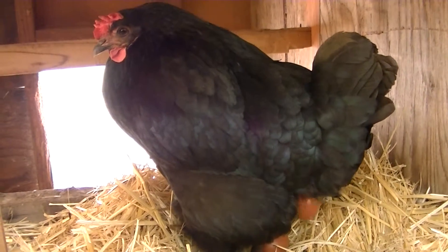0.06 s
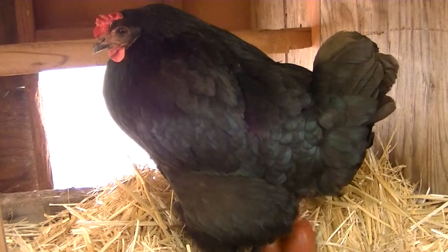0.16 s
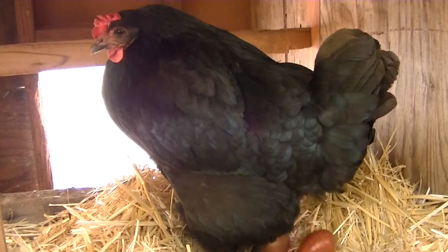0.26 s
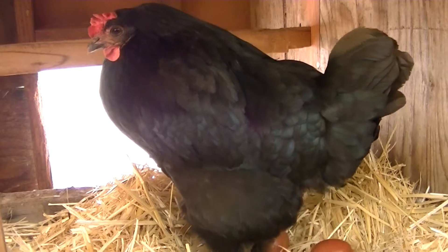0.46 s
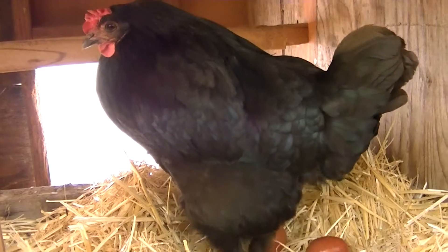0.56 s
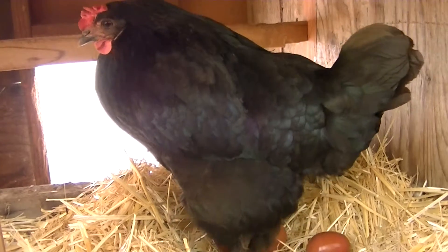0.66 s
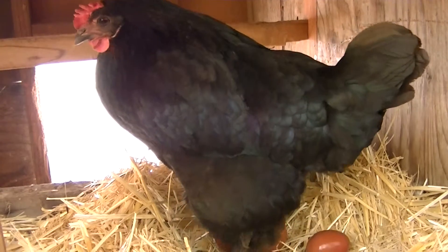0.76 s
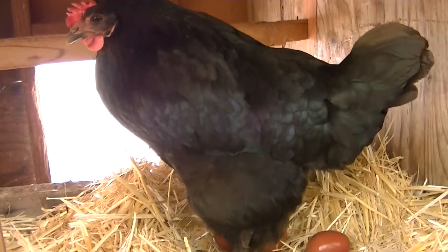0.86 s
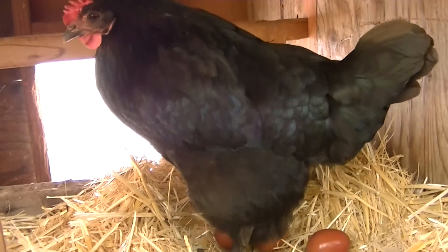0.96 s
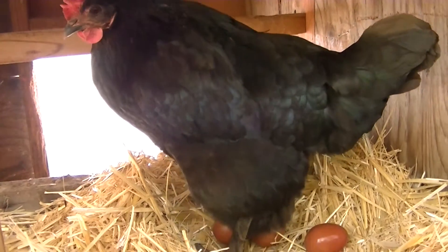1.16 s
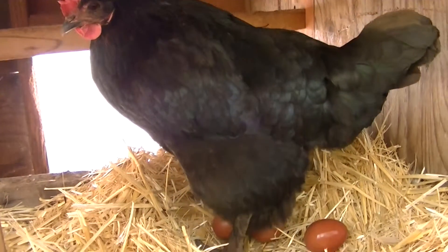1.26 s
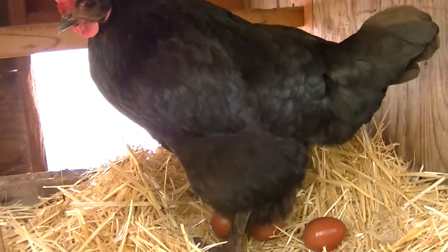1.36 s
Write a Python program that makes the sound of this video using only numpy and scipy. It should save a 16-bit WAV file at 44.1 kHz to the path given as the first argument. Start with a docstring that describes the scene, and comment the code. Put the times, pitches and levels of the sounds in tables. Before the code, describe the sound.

An egg drops with a sharp thud in a wooden nest box, then straw rustles faintly.

```python
"""A hen lays an egg

The egg drops through straw onto the wooden floor of a nest box. Impact excites the modes of shell
and boards, a click and a thud; the egg bounces and rolls away through crackling straw. The standing
hen shifts her feet, over a low outdoor rumble that comes into the small wooden coop."""
import sys
import numpy as np
from scipy import signal
from scipy.fft import rfft, irfft
from scipy.io import wavfile

SR = 44100
rng = np.random.default_rng(int(sys.argv[2]) if len(sys.argv) > 2 else 0)


def unload_audio(sound):
    """Save the sound as a 16-bit wav file, at the path given as the first command line argument."""
    columns = np.transpose(np.atleast_2d(sound))
    # keep every value between -1 and 1, then stretch to whole-number steps
    steps = np.round(np.clip(columns, -1, 1) * 32767)
    wavfile.write(sys.argv[1], SR, steps.astype(np.int16))


N = 61739
TIME = np.arange(N) / SR
FREQ_HZ = np.fft.rfftfreq(N, 1 / SR)

# The egg landing, bouncing and rocking on the floor: start_s, strength_db, contact_ms
KNOCKS = [(0.2066, -2, 0.15), (0.2273, -0.4, 0.87), (0.2535, -26.5, 0.46), (0.2691, -25.5, 0.76),
          (0.299, -12.5, 0.67), (0.3185, -23.5, 0.85), (0.343, -27.5, 1.13), (0.3678, -24, 1.3),
          (0.4149, -36.5, 0.42)]
# Spectrum of breaking straw: frequency_hz, density_db
STRAW_SPECTRUM = [(800, -26), (2000, 9), (3800, 3.5), (5500, -2), (8500, 0.5), (13000, -1.5), (16000, -4)]


def amp(db):
    """Amplitude ratio of a level in decibels."""
    return 10 ** (np.asarray(db) / 20)


def unit(x):
    """Normalisation to rms 1."""
    return x / np.sqrt(np.mean(x ** 2) + 1e-20)


def read(points, hz):
    """Interpolation on a log-frequency axis."""
    f, value = np.transpose(points)
    return np.interp(np.log(hz + 1), np.log(f + 1), value)


def level(points):
    """Amplitude envelope through rows of time_s, level_db."""
    return amp(np.interp(TIME, *np.transpose(points)))


def pan(lean_db):
    """Channel gains for a level difference; lean is left minus right."""
    return amp(np.array([[.5], [-.5]]) * lean_db)


def decay(start, t60):
    """Sudden onset and exponential decay, 60 dB in t60 seconds."""
    return (TIME >= start) * amp(-60 * np.maximum(TIME - start, 0) / t60)


def swells(rows):
    """Half-sine envelopes from rows of start_s, length_s, level_db."""
    return sum(amp(db) * np.sin(np.pi * np.clip((TIME - s) / length, 0, 1)) for s, length, db in rows)


def noise():
    """Two independent channels of white noise."""
    return rng.standard_normal((2, N))


def impulses(per_s):
    """Two Poisson-like impulse trains of random sign."""
    return np.sign(noise()) * (rng.random((2, N)) < per_s / SR)


def colour(x, spectrum, correlation=0., lean_db=0.):
    """Spectral shaping, correlation and balance of two independent channels; rms 1."""
    left, other = rfft(x)
    shared = np.clip(correlation, -1, 1)
    right = shared * left + np.sqrt(1 - shared ** 2) * other
    return unit(irfft(np.array([left, right]) * pan(lean_db) * amp(read(spectrum, FREQ_HZ)), N))


def outdoor_rumble():
    """Stationary noise: distant rumble and hiss, partly correlated between the channels."""
    # Outdoor background: frequency_hz, density_db
    spectrum = [(15, -58), (25, -38), (53, -23), (87, -13), (141, -7), (166, -10), (190, -6.5), (383, -7),
                (415, -6), (987, -9.5), (1190, -14), (1650, -15), (3910, -26.5), (12200, -35.5),
                (16000, -42)]
    # Likeness of left and right: frequency_hz, correlation
    likeness = [(60, 0.4), (180, -0.55), (550, 0.15), (1650, -0.44), (4970, -0.4), (15000, 0.31)]
    # Stereo balance: frequency_hz, lean_db
    balance = [(60, 1), (180, 2), (550, 3.5), (1650, -1), (4970, 0), (15000, 0.0)]
    return amp(-56.5) * colour(noise(), spectrum, read(likeness, FREQ_HZ), read(balance, FREQ_HZ))


def brushing():
    """Friction noise: straw and feathers brush softly, swelling and fading."""
    # Envelope of the brushing: time_s, level_db
    envelope = [(0, -90), (.25, -70), (.34, -66), (.45, -64), (.55, -66.5), (.66, -60), (.78, -70.5),
                (.86, -56), (.95, -64.5), (1.05, -69.5), (1.4, -74)]
    # Friction spectrum: frequency_hz, density_db
    spectrum = [(200, -14), (700, 11.5), (1400, 3), (1750, 0), (2050, 2.5), (2300, 0.5), (2600, -3.5),
                (2950, -11), (3600, -5.5), (5000, -20), (12000, -57)]
    return level(envelope) * colour(noise(), spectrum, correlation=0.18, lean_db=-1.5)


def hen_feet():
    """Friction and forced vibration: the hen shuffles in the bedding, then loads the boards."""
    # Shuffles in the bedding: start_s, length_s, level_db
    shuffles = [(.112, 0.026, -55.5), (.15, 0.066, -56)]
    # Rubbed bedding: frequency_hz, density_db
    bedding_spectrum = [(60, -27), (200, 9), (450, -14), (1000, -34), (4000, -55)]
    # Feet pressing the boards: start_s, length_s, level_db
    steps = [(0.575, 0.083, -56.5), (0.661, 0.064, -55), (0.738, 0.039, -59)]
    # Dull response of the boards: frequency_hz, density_db
    step_spectrum = [(40, -40), (120, -19.5), (175, 5), (230, -15), (350, -8), (700, -54), (3000, -55)]
    shuffling = swells(shuffles) * colour(noise(), bedding_spectrum, correlation=.9, lean_db=16)
    return shuffling + swells(steps) * colour(noise(), step_spectrum, correlation=0.99, lean_db=7)


def shell_click():
    """Impact excitation: each contact rings the shell's damped modes and crushes a little straw."""
    # Contacts of the shell: start_s, ring_db, crunch_db
    contacts = [(0.2052, 0.5, -0.5), (0.221, -16.5, -5.5)]
    # Eggshell modes: pitch_hz, level_db, t60_s, lean_db
    modes = [(4440, -48, 0.017, -9), (4700, -44, 0.017, 2), (5590, -50.5, 0.066, 16),
             (6764, -57.5, 0.12, -2), (7983, -48, 0.097, 3), (8430, -41, 0.044, 4), (9120, -38, 0.018, -4),
             (9680, -43, 0.045, -11.5), (11680, -45, 0.044, -12.5), (13080, -46, 0.03, -9),
             (14200, -50, .03, -10)]
    # Crushed straw: frequency_hz, density_db
    spectrum = [(60, -25), (900, 12.5), (1800, 1), (3500, -8.5), (6000, -7.5), (9000, -7.5), (11000, -7.5),
                (13700, -0.5), (16000, -10)]
    ring = sum(amp(db + mode_db) * pan(lean) * decay(s, t60) * np.sin(2 * np.pi * hz * (TIME - s))
               for s, db, _ in contacts for hz, mode_db, t60, lean in modes)
    crush = sum(amp(db) * decay(s, t60=0.062) for s, _, db in contacts)
    return ring + amp(-33.5) * crush * colour(noise(), spectrum, correlation=0.089)


def floor_thud():
    """Modal response of the floor to Gaussian force pulses: the longer the contact, the duller."""
    # Modes of the nest box floor: pitch_hz, level_db, t60_s
    modes = [(142.2, -43.5, 0.45), (186.3, -27, 0.27), (213.3, -26, 0.28), (230.5, -5.5, 0.044),
             (289.5, 2.5, 0.022), (334, -26.5, 0.083), (476, -13, 0.056), (603.7, -16, 0.084),
             (665, -27, 0.13), (813, -26, 0.076), (892.5, -26.5, 0.11), (1001, -27, 0.047),
             (1226, -25, 0.039), (1506, -28, 0.03), (1810, -17.5, 0.018)]
    # Stereo balance of the modes: frequency_hz, lean_db
    balance = [(60, 15), (250, 8.5), (450, 2), (700, 8), (950, -3), (1200, -4), (2000, 4)]
    radiation_cutoff_hz, left_delay_s = 151, .0001
    omega = 2 * np.pi * FREQ_HZ
    force = sum(amp(db) * np.exp(-1j * omega * s - .5 * (omega * ms / 1000) ** 2)
                for s, db, ms in KNOCKS)
    # Neighbouring modes swing in opposite directions and radiate little bass.
    ring = sum((-1) ** k * amp(db) * pan(read(balance, hz))
               * decay(0, t60) * np.sin(2 * np.pi * hz * TIME)
               for k, (hz, db, t60) in enumerate(modes))
    highpass = signal.butter(3, radiation_cutoff_hz, "highpass", fs=SR, output="sos")
    radiated = signal.sosfilt(highpass, ring)
    delay = np.exp(-1j * omega * np.array([[left_delay_s], [0]]))
    return irfft(rfft(radiated) * force * delay, N)


def plank_clatter():
    """Secondary impacts: each knock shakes a short, dense rattle from loose planks and packed straw."""
    # Rattling planks and straw: frequency_hz, density_db
    spectrum = [(60, -52), (150, -15), (380, 3.5), (550, -2), (730, 1), (950, -14), (1100, -24.5),
                (1700, -20), (2500, -33), (6000, -48)]
    shake = sum(amp(db) * decay(s, t60=0.096) for s, db, _ in KNOCKS)
    shake_rms = np.sqrt(np.mean(shake ** 2))
    return amp(-32) * shake_rms * colour(shake * noise(), spectrum, correlation=0.71, lean_db=4)


def box_shudder():
    """Coupled vibration: the landing spreads into the box; a deep mode and a rattle swell and die."""
    # Low rattle of the whole box: frequency_hz, density_db
    spectrum = [(25, -41), (50, -12), (75, -8), (105, 6), (135, -7), (210, -3), (400, -5), (700, -18),
                (1500, -37), (6000, -80)]
    landing_s, rise_s, mode_hz, lean_db = KNOCKS[0][0], 0.091, 65.2, 6.5
    age = np.maximum(TIME - landing_s, 0)
    envelope = (1 - np.exp(-age / rise_s)) ** 2 * decay(landing_s, t60=0.397)
    mode = amp(-32.5) * pan(lean_db) * np.sin(2 * np.pi * mode_hz * age)
    rattle = amp(-38) * colour(noise(), spectrum, correlation=0.98, lean_db=lean_db)
    return envelope * (mode + rattle)


def coop_reverberation(x):
    """Diffuse reflection from close wooden walls: a short tail whose treble is absorbed first."""
    # Reverberation time of the coop: frequency_hz, t60_s
    decay_times = [(80, 0.32), (250, 0.19), (600, 0.13), (1500, 0.14), (5000, 0.14), (15000, 0.084)]
    reflections = impulses(per_s=3000) * (TIME > .003)
    hz, t, spectrogram = signal.stft(reflections, SR, nperseg=256)
    absorption = amp(-60 * t / read(decay_times, hz)[:, None])
    _, tail = signal.istft(spectrogram * absorption, SR, nperseg=256)
    return signal.fftconvolve(x, tail / np.linalg.norm(tail[0]), axes=1)[:, :N]


def straw_crackle():
    """Shot noise: tiny crackles of random size merge with a hiss as the egg rolls over straw."""
    # Envelope of the crackling: time_s, level_db
    envelope = [(.2, -110), (.215, -74), (.285, -66.5), (.318, -57), (.34, -60.5), (.362, -58.5),
                (.40, -61), (.47, -64), (.555, -62.5), (.59, -74), (.69, -74), (.8, -95), (1.4, -100)]
    spread_db = 3.5
    sizes = amp(spread_db * np.minimum(rng.exponential(1, (2, N)), 4))
    grains = unit(sizes * impulses(per_s=3400))
    return level(envelope) * colour(grains + .5 * noise(), STRAW_SPECTRUM, correlation=0.13, lean_db=-1)


def stalk_snaps():
    """Brittle fracture: single stalks break, each with a brief burst of noise."""
    # Breaking stalks: start_s, level_db, lean_db
    snaps = [(0.314, -53, -1), (0.3245, -65, -2), (0.359, -53.5, 6), (0.3883, -52, 6), (0.5371, -51, 3),
             (0.563, -55.5, 3), (0.686, -58.5, 3)]
    bursts = sum(amp(db) * pan(lean) * decay(s, t60=0.014) for s, db, lean in snaps)
    return bursts * colour(noise(), STRAW_SPECTRUM, correlation=0.26)


def scene():
    """Superposition of all sources; the thud and the click also excite the coop's reverberation."""
    thud, click = floor_thud(), shell_click()
    reverberation = coop_reverberation(amp(-18) * thud + amp(-17) * click)
    landing = click + thud + reverberation + plank_clatter() + box_shudder()
    return landing + straw_crackle() + stalk_snaps() + brushing() + hen_feet() + outdoor_rumble()


def record(dry):
    """Band limiting: a linear-phase low-pass filter removes the highest treble."""
    cutoff_hz = 15900
    lowpass = signal.firwin(511, cutoff_hz, window=("kaiser", 9), fs=SR)
    return signal.oaconvolve(dry, lowpass[None], "same")


dry = scene()
out = record(dry)
unload_audio(out)
```